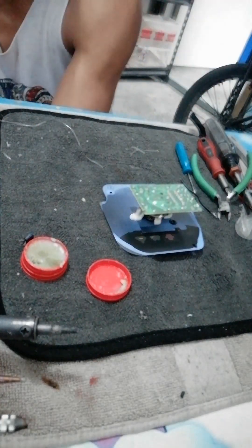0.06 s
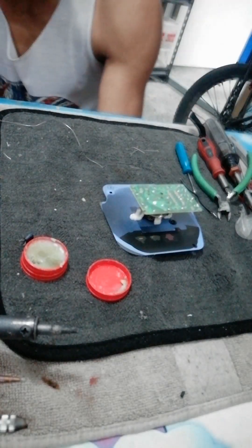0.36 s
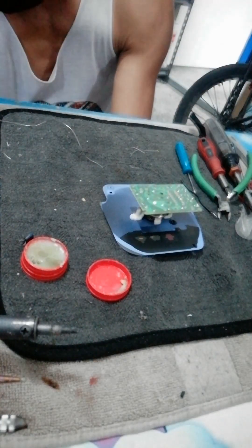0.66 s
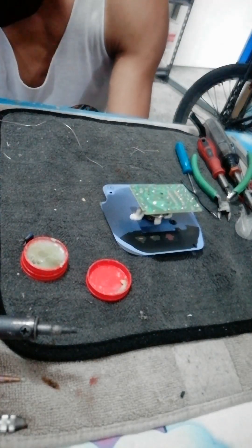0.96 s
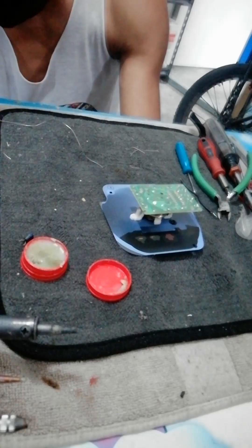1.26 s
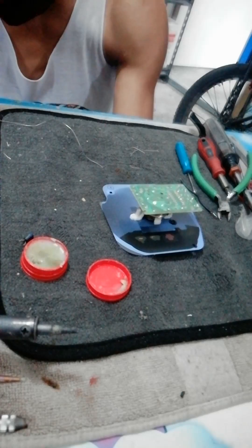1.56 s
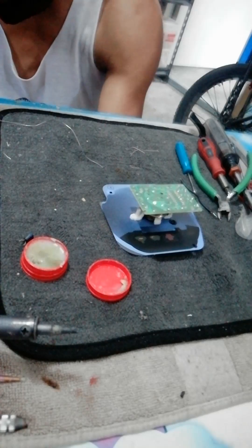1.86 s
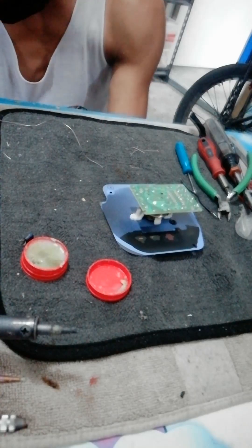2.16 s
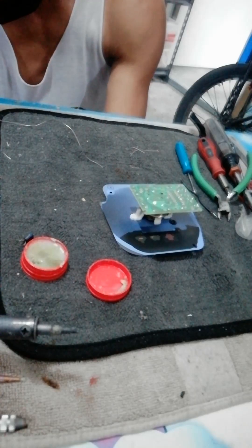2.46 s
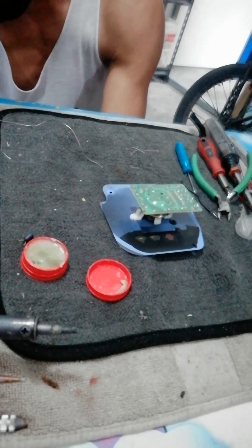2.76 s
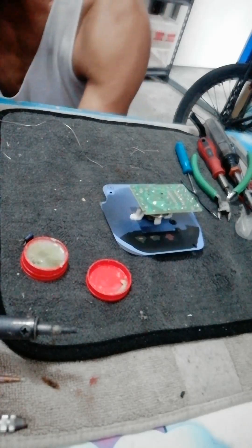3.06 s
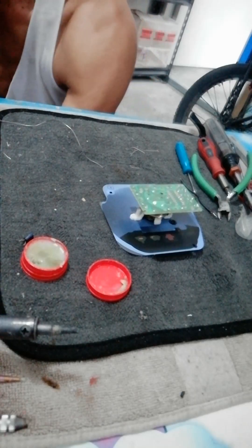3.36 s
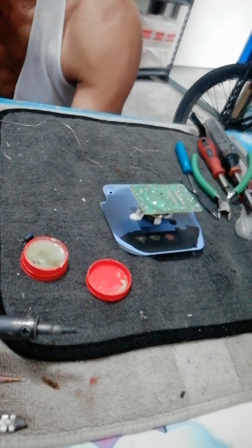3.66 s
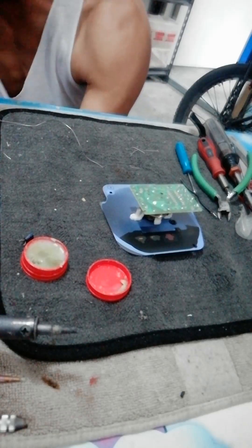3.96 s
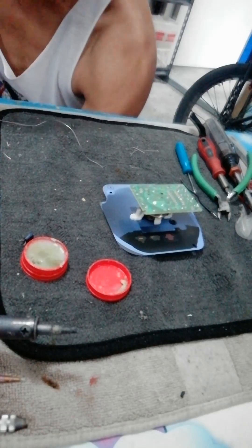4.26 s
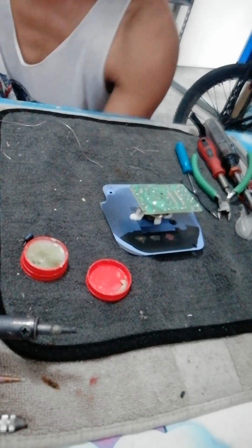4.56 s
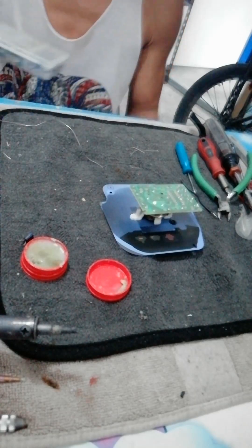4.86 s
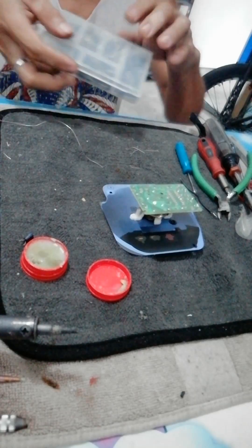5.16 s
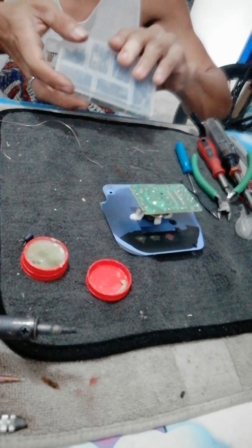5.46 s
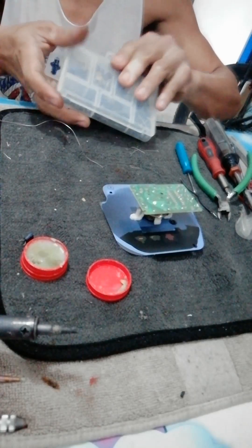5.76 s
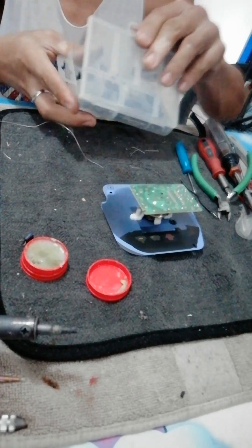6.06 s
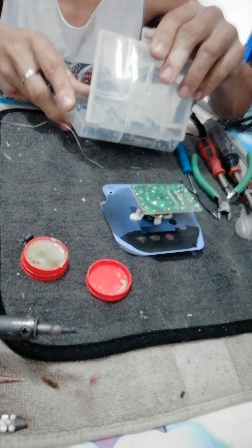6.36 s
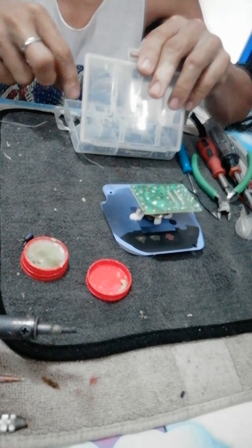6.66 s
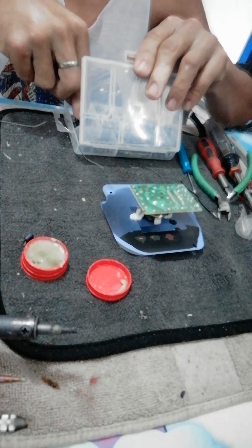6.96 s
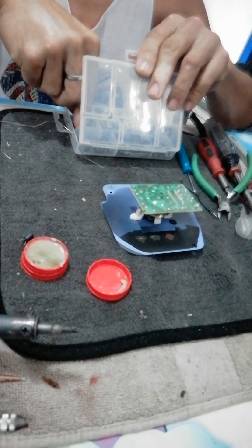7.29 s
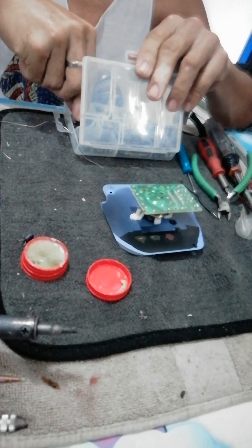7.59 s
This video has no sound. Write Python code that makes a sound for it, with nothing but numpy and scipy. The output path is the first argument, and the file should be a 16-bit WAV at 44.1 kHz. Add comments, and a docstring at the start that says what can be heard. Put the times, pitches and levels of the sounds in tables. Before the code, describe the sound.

A faint low hum and soft hiss fill a small bare room throughout. From the start, slightly to the right of the stereo microphones, someone rummages beside a workbench: light, irregular knocks, short slides and pings of small parts, each with a hollow answer from the bench and a short echo. A steel tool rings briefly at about 0.2 seconds and again at 3. The knocks cluster around 1.5 to 2 seconds and again near 3, then thin to soft taps and rubs. At about 4.4 seconds a plastic parts box is dragged out with two firm knocks and a short scrape. The handling moves to the front with a few faint ticks. At 5.6 seconds the latch opens with a sharp snap, the loudest sound. The plastic walls creak near 5.9 and 6.2 seconds. After a very faint rub, only room tone remains until about 7.5 seconds.

```python
"""Tools and small parts knock, slide and ping as someone rummages beside a workbench; a steel tool rings.
A clear plastic parts box is dragged out, its latch snaps open and its walls creak as they flex.
A stereo pair of microphones hears the hands off to the right at first, then in front with the box.
The bench rings under knocks and scrapes, and the small bare room answers, over faint hum and hiss."""
import sys
import numpy as np
from scipy import signal
from scipy.fft import rfft, irfft
from scipy.io import wavfile
from scipy.ndimage import uniform_filter1d

SR = 44100
rng = np.random.default_rng(int(sys.argv[2]) if len(sys.argv) > 2 else 0)


def transcribe(signal):
    """Save signal, clipped to [-1, 1], as a 16-bit WAV file at the path in sys.argv[1]."""
    frames = np.atleast_2d(signal).T
    limited = np.clip(frames, -1, 1)
    pcm = np.round(limited * 32767).astype(np.int16)
    wavfile.write(sys.argv[1], SR, pcm)


N = 336483
CONTACT_DECAY_S = .08  # a contact has died away after this time


def undb(db):
    """Decibels to gain."""
    return 10 ** (np.asarray(db) / 20)


def seconds(length):
    """Time axis of a given length."""
    return np.arange(int(length * SR)) / SR


def curve(points):
    """A control of (s, value) points, at every sample."""
    return np.interp(np.arange(N) / SR, *np.transpose(points))


def panned(left_minus_right_db):
    """Gains at the left and right microphones."""
    return undb(np.array([[1], [-1]]) * left_minus_right_db / 2)


def add(out, at, sound):
    """Mix a sound in from a given time on."""
    i = int(at * SR)
    out[:, i:i + sound.shape[-1]] += sound[..., :N - i]


def gains(points, hz):
    """Gain at given frequencies of a spectrum of (Hz, dB) points."""
    point_hz, db = np.transpose(points)
    return undb(np.interp(np.log(hz + 1), np.log(point_hz), db))


def coloured(x, points):
    """Give a long sound a spectrum."""
    return irfft(rfft(x) * gains(points, np.fft.rfftfreq(x.shape[-1], 1 / SR)), x.shape[-1])


def response(points, size=1024):
    """Causal impulse response with a given spectrum."""
    cepstrum = irfft(np.log(gains(points, np.fft.rfftfreq(size, 1 / SR))))
    cepstrum[1:size // 2] *= 2
    cepstrum[size // 2 + 1:] = 0
    return irfft(np.exp(rfft(cepstrum)))


def tilt(hz, db_per_octave, pivot_hz=3240, knee_hz=613):
    """Decibels that a harder or softer contact adds at a pitch; flat below the knee."""
    return db_per_octave * np.log2(max(hz, knee_hz) / pivot_hz)


def tilted(points, db_per_octave):
    """A spectrum made brighter or duller."""
    return [(hz, db + tilt(hz, db_per_octave)) for hz, db in points]


def hump(hz, centre_hz, octaves):
    """A bell over pitch, 1 at its centre."""
    return np.exp(-.5 * (np.log2(hz / centre_hz) / octaves) ** 2)


def resonances(x, modes):
    """Ring a sound through (Hz, width in Hz, dB) modes."""
    return sum(undb(db) * signal.lfilter(*signal.iirpeak(hz, hz / width, SR), x)
               for hz, width, db in modes)


def mode(hz, t60, rise_s=.0003):
    """One dying vibration, reaching the two microphones a quarter cycle apart."""
    t = seconds(t60)
    phase = 2 * np.pi * rng.random() + np.array([[0], [np.pi / 2]])
    return np.sin(2 * np.pi * hz * t + phase) * undb(-60 * t / t60) * (1 - np.exp(-t / rise_s))


def wander(rate_hz):
    """Smooth random drift with a spread near 1."""
    step = int(SR / rate_hz)
    held = np.repeat(rng.standard_normal(N // step + 1), step)
    return np.sqrt(2) * uniform_filter1d(held, step)[:N]


# Low rumble of the workshop. Each row: frequency in Hz, relative density in dB.
RUMBLE_SPECTRUM = [(12, -27), (25, -4.5), (38, 2), (58, -9.5), (72, -1), (93, -1.5), (112, -5),
                   (150, -12.5), (200, -16), (290, -21.5), (420, -36.5), (700, -81)]
# Still air around the microphones. Each row: frequency in Hz, relative density in dB.
AIR_SPECTRUM = [(200, -10), (300, -3.5), (430, -4.5), (620, -4.5), (760, -4), (850, -3.5), (1020, -2),
                (1220, -6), (2320, -7), (3640, -10), (6000, -14.5), (9000, -15), (11000, -23), (16000, -28)]
# Faint hum in the room. Each row: pitch in Hz, rms level in dB that it wavers around.
HUM_TONES = [(70, -64.5), (187, -82), (840, -78.5), (1120, -81)]


def room_tone(rumble_db=-53.5, air_db=-58.5, air_waver_db=1.0, hum_waver_db=3.2):
    """A low rumble and a wavering hum, alike at both microphones, under a wide soft hiss."""
    rumble = coloured(rng.standard_normal(N) + .037 * rng.standard_normal((2, N)), RUMBLE_SPECTRUM)
    air = coloured(rng.standard_normal((2, N)) + .19 * rng.standard_normal(N), AIR_SPECTRUM)
    air *= undb(air_waver_db * wander(3.87))
    air -= resonances(air.mean(axis=0), [(630, 260, -5)])  # in this band the sides move in opposition
    hum = np.zeros(N)
    for hz, db in HUM_TONES:
        amplitude = np.sqrt(2) * undb(db + hum_waver_db * wander(5.5))
        pitch_hz = hz + .1998 * np.sqrt(hz) * wander(20)
        hum += amplitude * np.sin(2 * np.pi * np.cumsum(pitch_hz) / SR)
    return undb(rumble_db) * rumble / rumble.std() + undb(air_db) * air / air.std() + hum


def burst(fade_s, rise_s):
    """Dense, quickly dying vibration of unit energy; each microphone hears another face of the object."""
    t = seconds(CONTACT_DECAY_S)
    envelope = np.exp(-t / fade_s) * (1 - np.exp(-t / rise_s))
    spectrum = rfft(rng.standard_normal((2, len(t))) * envelope)
    even = spectrum / np.abs(spectrum)  # a contact excites all frequencies about evenly
    x = irfft(even, len(t)) * envelope ** .5
    return x / np.sqrt(np.sum(x ** 2, axis=1, keepdims=True))


def object_ring(count=22, lowest_hz=900, span_ratio=13):
    """The scattered, well-damped modes of some odd object, with unit energy; high ones die sooner."""
    pitches = lowest_hz * span_ratio ** ((np.arange(count) + rng.random(count)) / count)
    out = np.zeros((2, len(seconds(CONTACT_DECAY_S))))
    for hz in pitches:
        ring = mode(hz, t60=.06 * (hz / lowest_hz) ** -.3)
        out[:, :ring.shape[1]] += ring * hz ** .65 * undb(3 * rng.standard_normal((2, 1)))
    return out / np.sqrt(np.sum(out ** 2, axis=1, keepdims=True))


# A contact of middling hardness. Each row: frequency in Hz, gain in dB.
KNOCK_SPECTRUM = [(70, -16.5), (270, -6), (450, 2), (1500, 2.5), (4000, 0), (8200, 0.5), (13000, -11),
                  (16000, -24)]
# Hard things knock together at the bench. Each row: start in seconds, relative level in dB, hardness
# as treble tilt in dB per octave, body pitch of the thing hit in Hz, contact time in seconds.
KNOCK_EVENTS = [(.1317, -22.5, -1, 1500, 0.002), (.202, -10.5, 0, 1550, 0.0024),
                (0.4302, -16.5, 1, 3100, 0.00085), (0.5939, -27, 3, 4480, 0.0032),
                (0.8023, -16.5, -.7, 1000, 0.0038), (0.8649, -9.5, 3.5, 7860, 0.003),
                (1.088, -12, -1.5, 2160, 0.0017), (1.1559, -17.5, 1, 4000, 0.0029),
                (1.4791, -21.5, 10, 12000, 0.00078), (1.5536, -13.5, -.5, 2700, 0.0048),
                (1.595, -7, 7.5, 11900, 0.0019), (1.61, -4, -.7, 1750, 0.0019),
                (1.6676, -3, 0, 4300, 0.001), (1.892, -17, 2.5, 4000, 0.0032),
                (1.901, -14, 4, 5000, 0.0019), (1.9774, -10, -0.5, 1450, 0.00069),
                (1.997, -3.5, -.5, 8500, 0.00097), (2.0766, -14, -1, 4030, 0.00098),
                (2.5765, -18.5, -2.5, 587, 0.0028), (2.8203, -10.5, -1, 2050, 0.0015),
                (2.851, -29, -5, 1500, 0.001), (2.8614, -11, -2, 2010, 0.00097),
                (2.897, -15, -2.5, 1540, .001), (2.9505, -15.5, -0.5, 7600, .0012),
                (2.9694, -7, -.5, 1220, 0.0012), (2.9947, -11, 8.5, 12300, 0.0018),
                (3.0207, -7, 0, 2430, 0.0032), (3.235, -21, -1, 1830, 0.0012),
                (3.3493, -25, -3.5, 600, 0.0011), (3.4092, -19.5, -2.5, 1740, 0.0031),
                (3.8274, -20, .5, 2920, 0.0025), (3.861, -21.5, 2.5, 6860, .003),
                (4.352, -0.5, 1, 1650, 0.0011), (4.3828, 3.5, 1, 3650, 0.0012),
                (5.15, -23.5, 1.5, 5000, .0006), (5.2828, -26, 2, 5500, 0.00091),
                (5.419, -27, -6, 854, 0.00074), (5.4634, -21.5, 3, 4470, 0.0023),
                (5.531, -15, 6.5, 7400, 0.00092), (5.6277, 5.5, 1.5, 835, 0.00077),
                (5.64, 2, 1.5, 7600, .003)]


def knocks(ring_s=.0015, body_db=5):
    """Short contacts: a crack and the ring of whatever is hit, brighter the harder it is."""
    out = np.zeros((2, N))
    hz = np.geomspace(70, 16000, 60)
    for at, db, hardness, body_hz, contact_s in KNOCK_EVENTS:
        colour_db = 20 * np.log10(gains(tilted(KNOCK_SPECTRUM, hardness), hz))
        colour_db += body_db * hump(hz, body_hz, octaves=.24)
        # a glancing contact swells and lasts longer
        crack = burst(fade_s=ring_s + 2.84 * contact_s, rise_s=contact_s)
        ring = object_ring() * (1 - np.exp(-seconds(CONTACT_DECAY_S) / contact_s))
        body = response(list(zip(hz, colour_db)))
        add(out, at, undb(db) * signal.fftconvolve(.8 * crack + .6 * ring, body[None], axes=1))
    return out


# A large panel thumps under every knock.
# Each row: pitch in Hz, level in dB relative to the knock's bass, time to fall 60 dB in seconds.
PANEL_MODES = [(209.5, -42, .2), (272.4, -43, .18)]


def panel_thumps(swell_s=.0052):
    """Each knock sets the panel swinging; soft, heavy ones move it most."""
    out = np.zeros((2, N))
    for at, db, hardness, *_ in KNOCK_EVENTS:
        for hz, mode_db, t60 in PANEL_MODES:
            swell = 1 - np.exp(-seconds(t60) / swell_s)
            add(out, at, undb(db + mode_db + tilt(hz, hardness)) * mode(hz, t60) * swell)
    return out


# Resonances of the workbench. Each row: pitch in Hz, width in Hz, relative gain in dB.
BENCH_MODES = [(212.4, 100, -0.5), (407, 29, -12), (573, 45, 1), (804, 90, -3.5), (988, 90, 1.5),
               (1380, 26.7, -35), (1790, 240, -5), (3180, 830, -13), (4320, 550, -8)]


def on_bench(x, contact_db=-2, bench_db=-2):
    """A sound plus the hollow answer of the bench."""
    return undb(contact_db) * x + undb(bench_db) * resonances(x, BENCH_MODES)


# The small bare room. Each row: frequency in Hz, reverberation time in seconds.
ROOM_DECAY = [(200, 0.38), (600, 0.21), (1500, 0.26), (4000, 0.29), (8000, 0.24), (15000, 0.31)]


def room_echo(x, first_s=.003, build_s=.0022, early_db=2, early_s=.021):
    """Bench and near walls reflect first, then a diffuse tail dies away, slowest in the bass."""
    t = seconds(.5)
    hz = np.fft.rfftfreq(len(t), 1 / SR)
    centres, t60s = np.transpose(ROOM_DECAY)
    noise = rfft(rng.standard_normal((2, len(t))))
    bands = (np.interp(np.log(hz + 1), np.log(centres), row) for row in np.eye(len(centres)))
    tail = sum(irfft(noise * band, len(t)) * undb(-60 * t / t60) for band, t60 in zip(bands, t60s))
    tail *= 1 - np.exp(-np.maximum(t - first_s, 0) / build_s)
    tail *= undb(early_db * np.exp(-t / early_s))
    return signal.fftconvolve(x, tail / np.sqrt(np.sum(tail ** 2) / 2), axes=1)[:, :N]


def scratchy_noise(size, spread_db=6, grains_per_s=900, grain_s=.0033):
    """Dense tiny grains of uneven size, like the slips of friction, rms 1."""
    grains = (rng.random(size) < grains_per_s / SR) * undb(spread_db * rng.standard_normal(size))
    power = signal.lfilter([1], [1, -np.exp(-1 / (grain_s * SR))], grains ** 2)
    return np.sqrt(power / power.mean()) * rng.standard_normal((2, size))


# Colour of the scratchy noise. Each row: frequency in Hz, gain in dB.
SCRATCH_SPECTRUM = [(80, -33), (190, -23), (280, -8), (400, -3.5), (700, -4), (1170, -7), (1600, -1.5),
                    (2400, -2.5), (3600, -2.5), (6000, -5), (8500, -3), (11500, -16.5), (14000, -21),
                    (16000, -31)]
# Short swells of scratchy noise: slides, rubs, and a brief hiss leading into a knock.
# Each row: start in seconds, length in seconds, relative level in dB, treble tilt in dB per octave.
SCRATCH_SWELLS = [(0.18, 0.051, -45.5, -3), (0.397, .12, -45, 2.5), (0.789, 0.092, -42, -1),
                  (0.887, 0.15, -43.5, 0), (1.091, 0.095, -40.5, 3.5), (1.857, 0.12, -33, -1),
                  (2.391, 0.16, -52, -3.5), (2.801, .11, -39, -3.5), (3.001, 0.12, -39.5, 1),
                  (3.369, .11, -48.5, -2), (3.83, 0.18, -44, 1), (3.969, .18, -47, 2),
                  (5.27, 0.18, -48, 0.5), (5.413, 0.11, -46, .5), (6.75, .2, -55.5, -2)]


def scratchy_swells(rise_share=.3):
    """Grainy noise that swells quickly and fades more slowly."""
    out = np.zeros((2, N))
    for at, length, db, tilt_db in SCRATCH_SWELLS:
        t = seconds(length)
        swell = np.interp(t / length, [0, rise_share, 1], [0, 1, 0])
        spectrum = tilted(SCRATCH_SPECTRUM, tilt_db)
        add(out, at, undb(db) * coloured(scratchy_noise(len(t)) * swell, spectrum))
    return out


# Ring of the steel tool. Each row: pitch in Hz, relative level in dB, time to fall 60 dB in seconds.
STEEL_MODES = [(1558, 0, 0.12), (3790, -1, 0.41), (5535, -1.5, 0.27), (7260, -3, .15), (10560, -5, .13),
               (10700, -1.5, 0.48), (10880, 0, 0.26), (11140, 0, 0.19)]
# Blows on it; sharper ones favour the high modes, and the spot struck favours one pitch.
# Each row: start in seconds, relative level in dB, treble tilt in dB per octave, favoured pitch in Hz.
STEEL_BLOWS = [(0.2035, -43.5, -4.5, 5542), (0.933, -56, 2, 5540), (1.1564, -58, 1.5, 5540),
               (1.5972, -61, 8.5, 10600), (2.9973, -43.5, 2, 3797)]


def steel_tool(favour_db=8, split=.00556, twin_db=-10, bounce_s=.0053, bounce_db=-6):
    """The tool is not quite symmetric, so each mode beats with a close twin; it bounces once on landing."""
    out = np.zeros((2, N))
    for at, blow_db, sharpness, favoured_hz in STEEL_BLOWS:
        for hz, mode_db, t60 in STEEL_MODES:
            db = blow_db + mode_db + tilt(hz, sharpness) + favour_db * hump(hz, favoured_hz, octaves=.12)
            add(out, at, undb(db) * mode(hz, t60))
            add(out, at, undb(db + twin_db) * mode(hz * (1 + split), t60))
            # touching down again detunes and damps the mode
            add(out, at + bounce_s, undb(db + bounce_db) * mode(hz * (1 - 2 * split), t60 / 2))
    return out


# Small loose parts under the hands.
# Each row: start in seconds, pitch in Hz, relative level in dB, time to fall 60 dB in seconds.
PART_PINGS = [(.4301, 4270, -18, 0.0057), (.8655, 7510, -25.5, 0.025), (.8655, 10400, -36, .04),
              (1.435, 2905, -50, 0.1), (1.4776, 7690, -28, .017), (1.4783, 10300, -25.5, 0.014),
              (1.5556, 2506, -37, 0.074), (1.5572, 2890, -42, 0.15), (1.61, 1600, -24.5, .022),
              (1.6687, 1027, -34, 0.058), (1.979, 1420, -23.5, 0.015), (1.9987, 8240, -12.5, 0.013),
              (2.24, 2850, -62.5, 1), (2.8211, 2040, -20, 0.01), (2.9702, 1006, -25, 0.025),
              (4.353, 1650, -25, .046)]


def loose_parts():
    """Small parts ping when hit, each at its own pitch."""
    out = np.zeros((2, N))
    for at, hz, db, t60 in PART_PINGS:
        add(out, at, undb(db) * mode(hz, t60))
    return out


# The box scrapes out from among the other things. Each row: time in seconds, relative level in dB.
DRAG_LEVELS = [(4.325, -70), (4.333, -37), (4.353, -28), (4.373, -25.5), (4.385, -22.5), (4.409, -33.5),
               (4.453, -37.5), (4.48, -53)]


def box_drag(gain_db=3):
    """One firm stroke of friction as the box is pulled out."""
    t = np.arange(N) / SR
    moving = (t > DRAG_LEVELS[0][0]) & (t < DRAG_LEVELS[-1][0])
    return coloured(scratchy_noise(N) * moving * undb(gain_db + curve(DRAG_LEVELS)), SCRATCH_SPECTRUM)


# Plastic walls of the box. Each row: pitch in Hz, width in Hz, gain in dB.
WALL_MODES = [(640, 200, -28), (885, 49, -26.5), (1290, 230, 6.5), (2860, 300, -2.5), (3412, 800, 3),
              (4910, 350, -3), (6630, 1400, -5.5), (8550, 1000, -7)]
# The walls flex in front of the microphones.
# Each row: start in seconds, relative level in dB, fade time in seconds.
WALL_JOLTS = [(5.6261, 6, 0.002), (5.8897, -14, 0.0049), (5.899, -13.5, 0.014), (5.911, -15.5, 0.004),
              (5.924, -19, .004), (6.202, -19, 0.0052), (6.2401, -14, 0.00355), (6.255, -17, 0.0037),
              (6.2735, -21, 0.0033), (6.29, -22, 0.0097)]


def box_creaks(cutoff_hz=8000):
    """Latch and hinge slip in jolts that ring the damped walls; the soft plastic gives little treble."""
    push = np.zeros((2, N))
    for at, db, fade_s in WALL_JOLTS:
        add(push, at, undb(db) * burst(fade_s, rise_s=.00134))
    return signal.sosfilt(signal.butter(4, cutoff_hz, fs=SR, output="sos"), resonances(push, WALL_MODES))


# Box, lid and latch flap ring together. Each row: pitch in Hz, relative level in dB,
# time to fall 60 dB in seconds, left minus right microphone in dB.
LATCH_MODES = [(213, -10, 0.13, -1), (473, -1.5, 0.038, 7), (630, 2, 0.029, 0), (750, 1.5, 0.019, 20.5),
               (875, -4.5, .1, 10), (1352, 0, 0.058, -2), (2700, -8, .05, -6)]


def latch_snap(at_s=5.628, level_db=-27):
    """The latch lets go and its flap and the lid ring briefly."""
    out = np.zeros((2, N))
    for hz, db, t60, pan_db in LATCH_MODES:
        add(out, at_s, undb(level_db + db) * panned(pan_db) * mode(hz, t60))
    return out


# The hands, off to the right among the tools, then in front with the box.
# Each row: time in seconds, left minus right microphone in dB.
HAND_POSITIONS = [(0, -3), (2, -3.5), (4.4, -3), (5.1, 1.5)]


def scene(scratch_pan_share=.26):
    """From the microphones' spot: the handling at the bench, its echo off the walls, and the room tone."""
    hits = on_bench(knocks())
    scratches = on_bench(scratchy_swells() + box_drag())
    parts, tool, snap, creaks = loose_parts(), steel_tool(), latch_snap(), box_creaks()
    sends_db = [(hits, -2), (parts, -6), (snap, -7), (tool, -16), (scratches, -1), (creaks, -4)]
    echo = room_echo(sum(undb(db) * sound for sound, db in sends_db))
    place = panned(curve(HAND_POSITIONS))
    at_hands = (hits + parts) * place + scratches * place ** scratch_pan_share
    return at_hands + panel_thumps() + tool + snap + creaks + echo + room_tone()


def record(dry):
    """The phone that carries the microphones cuts the treble above 16.2 kHz."""
    return signal.sosfilt(signal.ellip(10, .2, 70, 16200, fs=SR, output="sos"), dry)


dry = scene()
out = record(dry)
transcribe(out)
```